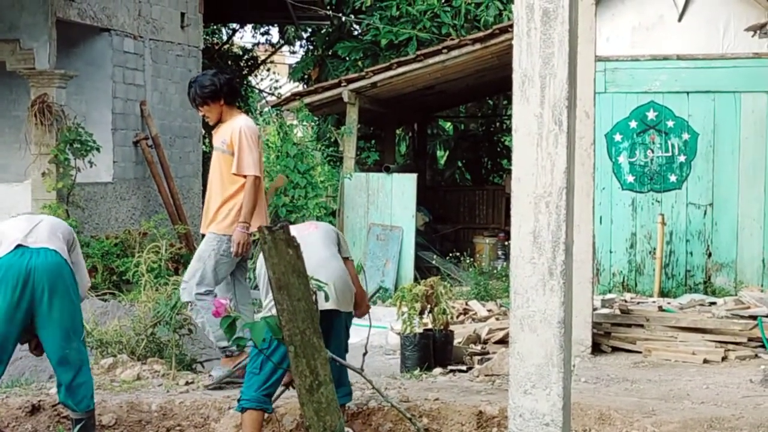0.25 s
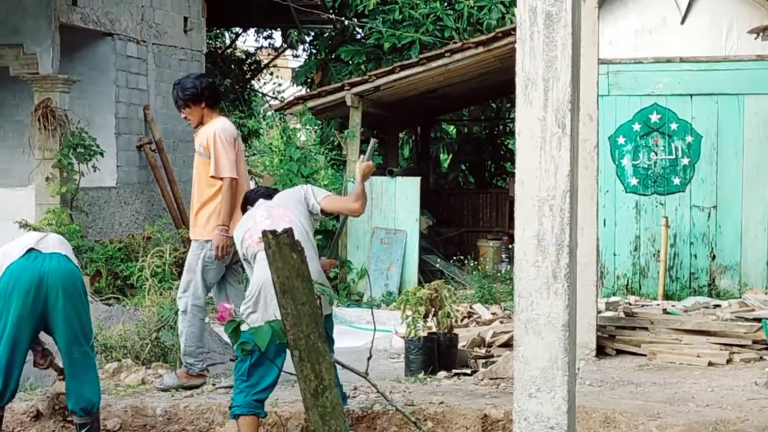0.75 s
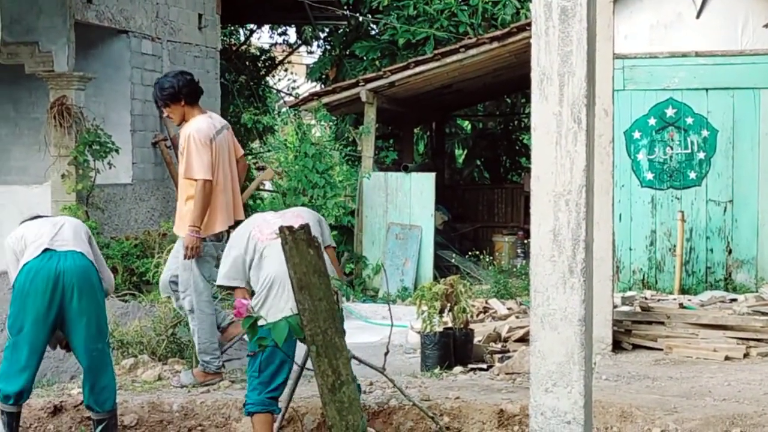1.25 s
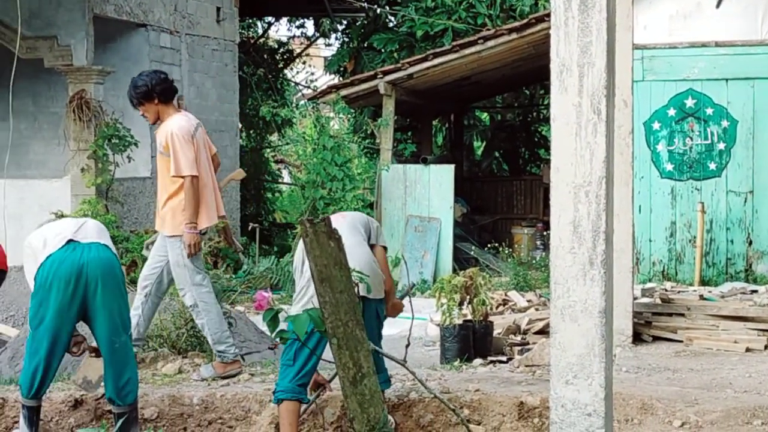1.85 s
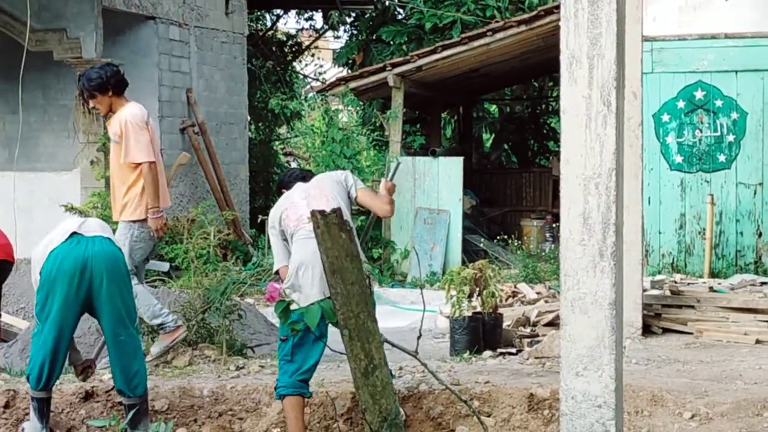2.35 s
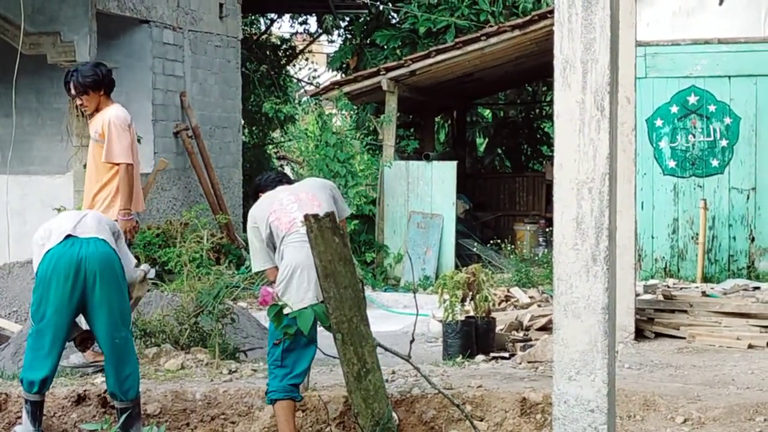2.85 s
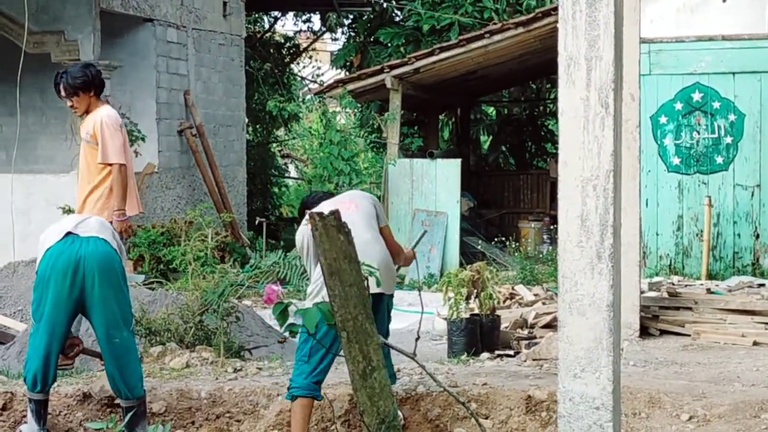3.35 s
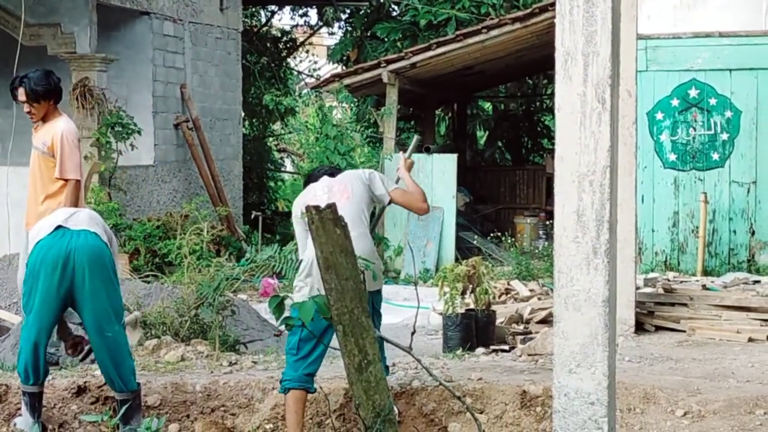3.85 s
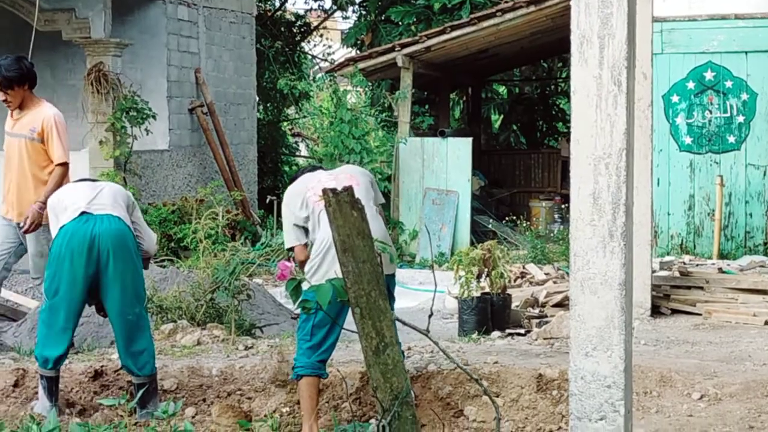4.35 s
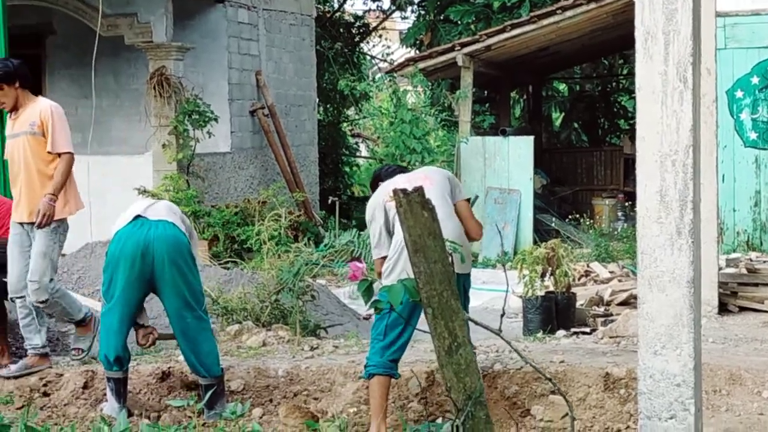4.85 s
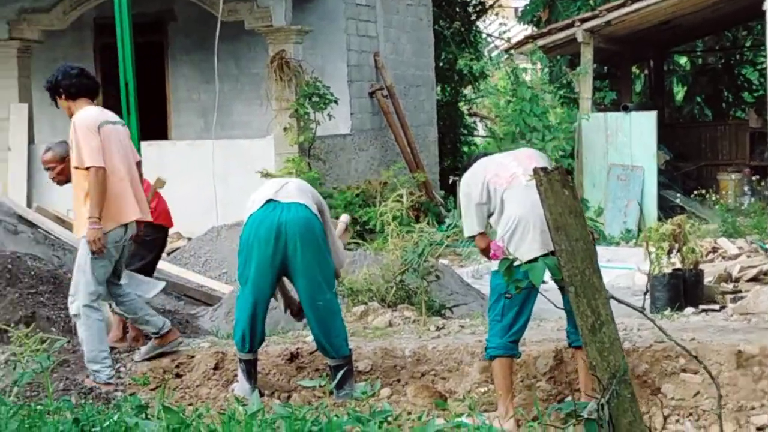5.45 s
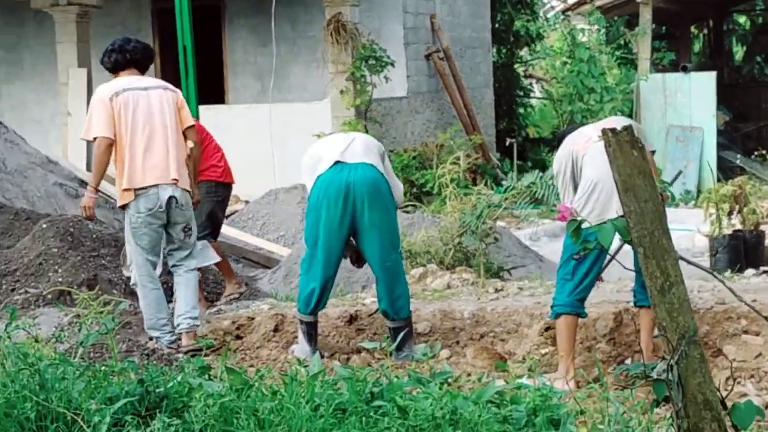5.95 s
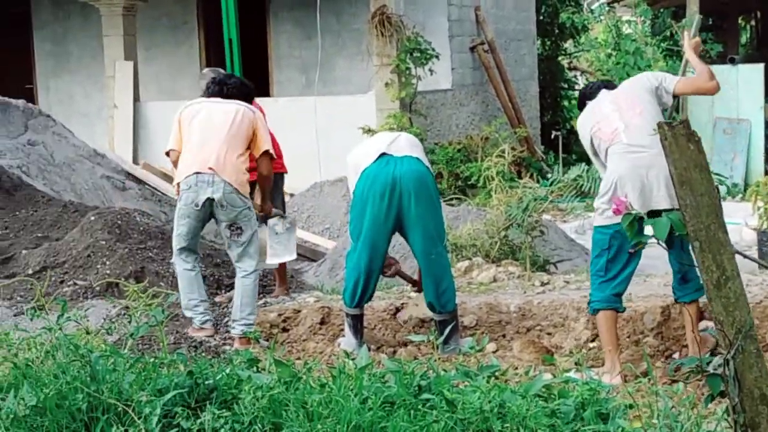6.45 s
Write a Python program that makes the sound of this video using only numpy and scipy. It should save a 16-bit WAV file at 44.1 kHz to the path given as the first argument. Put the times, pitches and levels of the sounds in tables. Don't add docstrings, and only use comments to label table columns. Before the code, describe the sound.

A quiet opening with pebble ticks and faint peeping gives way to a bright shovel strike, then more irregular blows into gravel and earth. Scrapes, sliding sand and small stone clinks fill the gaps, and a couple of strikes add a woody handle knock. Small birds whistle and chirp further off between buildings, with shimmering insects, open air and low traffic behind, picked up by a phone outdoors.

```python
import sys
import numpy as np
from scipy import signal
from scipy.fft import rfft, irfft, next_fast_len
from scipy.io import wavfile
from scipy.ndimage import uniform_filter1d, map_coordinates

SR = 44100
rng = np.random.default_rng(int(sys.argv[2]) if len(sys.argv) > 2 else 0)


def to_wav(sig):
    pcm = np.clip(np.atleast_2d(sig), -1, 1) * 32767
    pcm = np.round(pcm).astype(np.int16)
    wavfile.write(sys.argv[1], SR, pcm.T)


def gain_from_decibels(decibels):
    exponent = np.asarray(decibels, float) / 20
    return 10 ** exponent


N = 295029


def unit(x):
    return x / np.sqrt(np.mean(x ** 2) + 1e-20)


def along(points, hz):
    f, v = np.transpose(points)
    return np.interp(np.log(hz + 1), np.log(f + 1), v)


def from_time(x, s):
    return x[..., round(s * SR):]


def wobble(rate):
    knots = rng.standard_normal(int(N * rate / SR) + 4)
    return map_coordinates(knots, [np.arange(N) * rate / SR])


def filtered(x, response):
    m = next_fast_len(N + SR // 2)
    return irfft(rfft(x, m) * response(np.fft.rfftfreq(m, 1 / SR)), m)[..., :N]


def coloured(x, spectrum):
    return unit(filtered(x, lambda hz: gain_from_decibels(along(spectrum, hz))))


def hiss(spectrum):
    return coloured(rng.standard_normal(N), spectrum)


def peak(hz, centre_hz, width_hz):
    return 1j * hz * width_hz / (centre_hz ** 2 - hz * hz + 1j * hz * width_hz)


def patchy(patchy_db, wide=5, long=10):
    z = signal.stft(rng.standard_normal(N), nperseg=256)[2]
    field = uniform_filter1d(rng.standard_normal(z.shape), wide, 0)
    field = uniform_filter1d(field, long, 1)
    return signal.istft(z * gain_from_decibels(patchy_db * unit(field)), nperseg=256)[1][:N]


# (frequency [Hz], level [dB], t60 [s])
BLADE_MODES = [(1294, -17, 0.2), (1720, -51, 0.13), (2030, -31, 0.12), (2480, -20, 0.017),
               (2790, -16, 0.38), (3350, -23, 0.18), (5380, -20, 0.1), (5560, -26.5, 0.16),
               (6700, -34, 0.2), (11700, -22, 0.036)]
# (frequency [Hz], level [dB per Hz])
STEEL_SPECTRUM = [(410, -104), (700, -19.5), (1110, -5), (1260, -6), (1380, -4.5), (1790, -5.5), (2090, -3),
                  (2760, 1.5), (3330, -3), (3780, -47), (4200, -13.5), (5460, -111), (9240, -120)]
# (frequency [Hz], level [dB per Hz])
SOIL_SPECTRUM = [(59, -17), (100, -15), (167, -2), (360, -14), (509, -3), (786, -10.5), (1000, -1),
                 (1300, -58), (2200, -120)]
# (frequency [Hz], level [dB per Hz])
GRIT_SPECTRUM = [(2120, -27), (3600, -4.5), (3820, -9), (5330, 4.5), (5710, 3), (6470, -3), (7610, 1.5),
                 (8650, -9), (10000, -5), (13000, -31), (22000, -120)]
# (frequency [Hz], level [dB per Hz])
SAND_SPECTRUM = [(5290, -17), (9000, -11.5), (9600, -10), (10300, -2), (13300, 7), (14700, 1), (15600, -14),
                 (16000, -9)]


def strokes():
    blade_level, soil_level, grit_level, sand_level = effort()
    judder = 1.3 * wobble(28) + 0.8 * wobble(130)
    chance, size = rng.random((2, N))
    stone_size = gain_from_decibels(-3.5 * np.log(size + 0.032))
    stones = unit((chance < 1200 / SR) * stone_size)

    def grains(bed, share, own_db):
        cracks = share * stones * rng.choice([-1, 1], N)
        return gain_from_decibels(judder + own_db * wobble(170)) * (bed + cracks)

    steel = unit(grains(patchy(4.5, wide=1, long=31), share=0.58, own_db=1.04))
    hum = filtered(steel, lambda f: sum(gain_from_decibels(db) * peak(f, hz, 12 / t60)
                                        for hz, db, t60 in BLADE_MODES[:6]))
    slips = gain_from_decibels(4 * wobble(22))
    blade = unit(coloured(steel, STEEL_SPECTRUM) + 0.4 * slips * unit(hum))
    soil = coloured(grains(patchy(0.5, wide=1, long=20), share=0.63, own_db=2.5), SOIL_SPECTRUM)
    grit = coloured(grains(patchy(2.5, wide=3, long=15), share=0.35, own_db=1.5), GRIT_SPECTRUM)
    sand = coloured(grains(patchy(2.2, wide=8, long=4), share=0.6, own_db=2.2), SAND_SPECTRUM)
    earth = soil_level * soil + gain_from_decibels(4) * grit_level * grit + sand_level * sand
    return gain_from_decibels(6) * blade_level * blade + earth


# (time [s], blade level [dB], fall [dB/s],
# soil re blade [dB], sand re blade [dB])
SETTLES = [(0.0, -38.5, 135, -5, -1.5), (0.839, -36.5, 115, -15, 5), (1.203, -49, 144, -2.5, 5.5),
           (1.733, -35, 122, -1.5, 1.5), (2.586, -39, 87, -15, 6.5), (2.957, -51.5, 165, -3, 1),
           (3.378, -39, 116, -6.5, -6), (4.059, -34.5, 138, -27, 5), (4.754, -43, 119, -2.5, -13),
           (4.922, -39, 103, -17, 7), (5.53, -47.5, 145, -1.5, -4), (5.744, -32.5, 132, -15, 4.5),
           (6.577, -41.5, 136, -12, 2)]
# (time of full pressure [s], rise [s], hold [s], blade level [dB],
# sand re blade [dB])
DRAGS = [(0.158, 0.15, 0.16, -53, 1), (0.415, .1, 0.2, -76, 12), (1.98, 0.57, 0.087, -57.5, -4),
         (2.747, 0.093, 0.066, -60, 0.5), (2.258, 0.12, 0.017, -42.5, -10),
         (2.423, 0.28, 0.068, -41.5, -2.5), (3.694, 0.027, 0.22, -50.5, 3), (3.89, 0.087, 0.029, -45, -12),
         (3.702, .02, 0.015, -48.5, 1), (4.008, 0.15, 0.046, -46.5, -14), (4.224, .08, 0.056, -50.5, -15),
         (4.36, 0.33, 0.082, -56.5, -5), (4.757, 0.034, 0.13, -52, 0.5), (5.03, 0.081, 0.022, -47, -3),
         (5.337, 0.14, 0.037, -46, -4)]
SOIL_FALLS, GRIT_FALLS, SAND_FALLS = 1.96, 1.26, 2.9
TRICKLE_DB, TRICKLE_DB_PER_S = -18, 41
RISE_DB, RELEASE_DB_PER_S, DRAG_SOIL_DB = 34, 124, -10
GRIT_DB, GRIT_FOLLOWS = -9, 0.9


def effort():
    t, power = np.arange(N) / SR, np.full((4, N), 1e-12)
    falls = np.array([1, SOIL_FALLS, GRIT_FALLS, SAND_FALLS])[:, None]

    def mix(soil_db, sand_db):
        return np.array([0, soil_db, GRIT_DB + GRIT_FOLLOWS * sand_db, sand_db])[:, None]

    for s, db, fall, soil_db, sand_db in SETTLES:
        u = from_time(t, s)[:SR] - s
        slide = gain_from_decibels(-fall * falls * u) ** 2
        trickle = gain_from_decibels(TRICKLE_DB * falls - TRICKLE_DB_PER_S * u) ** 2
        start = np.clip(u / 0.0074, 0, 1)
        from_time(power, s)[:, :SR] += gain_from_decibels(db + mix(soil_db, sand_db)) ** 2 * (slide + trickle) * start
    for s, rise, hold, db, sand_db in DRAGS:
        before_db = RISE_DB * np.maximum(s - t, 0) / rise
        after_db = RELEASE_DB_PER_S * np.maximum(t - s - hold, 0)
        power += gain_from_decibels(db - before_db - after_db) ** 2 * gain_from_decibels(mix(DRAG_SOIL_DB, sand_db)) ** 2
    return np.sqrt(power)


def blows():
    t = np.arange(SR // 4) / SR
    body, top, ring = np.zeros((3, N + SR))
    mode_hz, mode_db, mode_t60 = np.transpose(BLADE_MODES)[..., None]
    for s, db, sparkle_db, ring_db, knock_hz in contacts():
        crack, crumble = gain_from_decibels(db - 60 * t / 0.02), gain_from_decibels(db - 12 - 60 * t / 0.033)
        burst = (crack + crumble) * (1 - np.exp(-t / 0.0021))
        from_time(body, s)[:len(t)] += burst
        from_time(top, s)[:len(t)] += gain_from_decibels(sparkle_db) * burst * gain_from_decibels(-60 * t / 0.055)
        sway, turn = np.clip(rng.standard_normal((2, len(BLADE_MODES), 1)), -1.3, 1.3)
        rattle = np.cumsum(0.1 * rng.standard_normal((len(BLADE_MODES), len(t))), axis=1)
        phase = 2 * np.pi * mode_hz * (1 + 0.0147 * turn) * t + rattle
        modes = gain_from_decibels(mode_db + 8.9 * sway - 60 * t / mode_t60) * np.sin(phase)
        from_time(ring, s)[:len(t)] += gain_from_decibels(db + ring_db) * modes.sum(0) * (1 - np.exp(-t / 0.0071))
        spot = np.sin(2 * np.pi * knock_hz * t + 2 * rattle[0])
        from_time(ring, s)[:len(t)] += gain_from_decibels(db - 15 - 60 * t / 0.067) * spot

    def crush(spectrum):
        return coloured(gain_from_decibels(3 * wobble(500)) * rng.standard_normal(N), spectrum)

    sparkle = filtered(crush(SAND_SPECTRUM), lambda f: 1 / (1 + (f / 14500) ** 10))
    sparkle = sparkle + gain_from_decibels(-7) * crush(GRIT_SPECTRUM)
    return gain_from_decibels(-8.5) * (body[:N] * crush(STEEL_SPECTRUM) + top[:N] * sparkle) + ring[:N]


# (time [s], peak level [dB], sparkle re peak [dB], ring re peak [dB],
# knock [Hz])
SWINGS = [(0.8449, -7.5, 7.5, -6, 2916), (0.8519, -8, -18, -19, 1720), (1.7348, -8, 4.5, -16, 2790),
          (1.7593, -14, -23, -19, 2220), (2.3398, -18.5, -9, -8, 3220), (2.586, -8, 6, -15.5, 1845),
          (3.3701, -18, 7, -2, 1736), (4.059, -11, 2, -30, 2103), (4.0672, -11, -13, -6, 2012),
          (4.2294, -17, -5.5, -32, 2480), (4.7535, -16, -11, -21, 2480), (4.9235, -5.5, -2.5, -13, 1748),
          (5.7443, -5.5, -5, -4.5, 2890), (6.0798, -34, -28, -12.5, 1230), (6.5782, -12.5, 2, -23, 2806)]
# (time [s], peak level [dB], sparkle re peak [dB], ring re peak [dB])
CATCHES = [(0.4025, -50, -21, -18), (0.712, -33, -29, -32), (0.8827, -11, -18, -7),
           (1.2032, -18, -2.5, -31), (1.63, -32, -31, -22), (1.7757, -16.5, -3, -1),
           (2.2424, -27, -14, -16), (2.2674, -17, -5, -28), (2.374, -15.5, -6, -11),
           (2.956, -24.5, -23, -27), (3.7069, -18.5, 3.5, -29), (3.714, -13, -12, -22),
           (3.7358, -27.5, -22, -33), (3.783, -19, -2, -21), (3.9836, -20.5, -1, -7),
           (4.2127, -25, 6.5, -6.5), (4.3377, -25.5, -9, -6), (5.0398, -17, 4, -29), (5.2864, -52, -8, -12),
           (5.526, -23.5, -31, -16), (6.528, -37, -27, -14)]
CATCH_HZ = 2783
# (time [s], peak level [dB], knock [Hz])
HANDLE_BLOWS = [
    (3.371, -10, 1100),
    (3.391, -24, 1270),
    (5.741, -12, 1402),
]
HANDLE_DULL_DB = -36


def contacts():
    catches = [(*row, CATCH_HZ) for row in CATCHES]
    handle = [(s, db, HANDLE_DULL_DB, HANDLE_DULL_DB, hz) for s, db, hz in HANDLE_BLOWS]
    return sorted([*SWINGS, *catches]) + handle


# (time [s], level [dB])
THUDS = [(0.7146, -40), (0.8445, -27.5), (0.851, -39), (1.735, -30), (1.7593, -53), (2.246, -36),
         (2.264, -33), (2.587, -29.5), (2.961, -37.5), (3.3701, -44), (3.713, -46), (4.069, -37),
         (4.336, -36), (4.9224, -28.5), (5.0396, -38), (5.7443, -29.5), (6.528, -43.5)]
# (frequency [Hz], level [dB per Hz])
GROUND_SPECTRUM = [(70, -53), (130, 10.5), (300, 6), (480, 2), (700, -69), (1200, -56)]


def thuds():
    t, low = np.arange(SR // 4) / SR, np.zeros(N + SR)
    for s, db in THUDS:
        from_time(low, s)[:len(t)] += gain_from_decibels(db + 2 - 60 * t / 0.055) * (1 - np.exp(-t / 0.0068))
    return low[:N] * hiss(GROUND_SPECTRUM)


# (time [s], peak level [dB], frequency [Hz], t60 [s])
CHIPS = [(0.8465, -10.5, 2880, .012), (0.8463, -10, 11700, 0.013), (0.851, -18.5, 11900, 0.018),
         (0.8665, -23, 2900, .03), (0.868, -37, 12200, 0.026), (0.876, -28, 12000, 0.017),
         (0.883, -18, 2830, 0.022), (0.8902, -16, 2950, .02), (0.898, -23, 2780, .03),
         (5.284, -46, 4400, .02), (1.738, -13, 11700, 0.017), (1.742, -16, 12200, .015),
         (1.7415, -24, 3080, 0.012), (1.7735, -28, 10850, 0.033), (1.775, -28, 12700, 0.024),
         (1.781, -29, 13600, .02), (2.5858, -4, 2200, 0.0071), (2.5874, -6, 2600, 0.0073),
         (2.586, -15.5, 12100, 0.0085), (2.96, -37, 2250, .03), (2.884, -42, 3030, .015),
         (3.3715, -14, 1730, 0.0078), (3.7365, -19, 2800, 0.023), (3.838, -30, 2650, 0.037),
         (3.855, -31, 2490, 0.036), (4.0594, -7.5, 2000, 0.0091), (4.0695, -10, 2140, 0.0087),
         (4.068, -39, 12400, 0.023), (4.076, -35, 11400, 0.018), (4.9245, -4, 2550, 0.0055),
         (5.744, -18, 10780, 0.018), (5.744, -24, 13700, 0.026), (5.746, -8.5, 2750, 0.011),
         (5.7485, -8, 2800, .01), (6.5755, -19, 2380, 0.011), (6.5755, -28, 12500, .012),
         (6.587, -21, 2870, 0.017)]
# (time [s], peak level [dB], frequency [Hz], t60 [s])
KNOCKS = [(0.35, -53, 215, .05), (2.092, -44, 299, 0.055), (2.246, -37, 503, .05), (3.715, -44, 417, .1),
          (3.8, -54, 440, 0.12), (3.9, -51, 430, 0.17), (3.986, -38, 690, 0.046), (5.039, -38, 456, 0.067),
          (5.391, -38.5, 452, 0.067), (5.525, -44, 306, .05), (5.527, -43.5, 920, 0.097),
          (0.86, -37, 1150, .12), (4.923, -24, 1470, 0.054), (2.44, -36, 1240, 0.17),
          (2.49, -38, 2070, 0.13), (6.083, -51, 250, .06), (6.548, -31.5, 453, 0.017),
          (3.385, -34, 2614, 0.28), (3.39, -38.5, 1237, .25), (5.746, -26, 2148, 0.24),
          (6.579, -39, 390, .06)]


def chips():
    out, t = np.zeros(N + SR), np.arange(SR // 5) / SR
    for s, db, hz, t60 in [*CHIPS, *KNOCKS]:
        onset = 1 - np.exp(-t * hz / 1.64)
        from_time(out, s)[:len(t)] += gain_from_decibels(db - 60 * t / t60) * np.sin(2 * np.pi * hz * t) * onset
    return out[:N]


# (time [s], peak level [dB], body re peak [dB])
TICKS = [(0.025, -24, -4), (0.07, -25, -5), (0.877, -24, 5), (0.995, -45, -10), (1.165, -42, -15),
         (1.4726, -46, -16), (1.871, -36, -20), (1.9934, -35, 4), (2.0656, -32.5, 1), (2.6938, -33, -8),
         (3.6738, -41.5, 17.5), (3.6964, -37, -14), (3.7703, -23, -17), (3.8004, -19.5, 2),
         (3.9664, -31, -15), (3.82, -33, -5), (3.838, -33, -6), (4.0223, -34, -3), (4.1345, -26, 2.5),
         (4.189, -33, -4), (4.152, -32, -13), (4.7745, -22, -4), (5.278, -37, 0), (5.3577, -30, -8),
         (0.403, -39, 4.5), (0.648, -45, 5), (0.733, -48, 0), (2.396, -27, -8), (2.419, -30, -8),
         (2.44, -26, -1), (2.471, -33, -11), (2.507, -40, -6), (2.298, -36, -10), (2.257, -24, -14),
         (2.3631, -22, -3), (4.8286, -39, -10), (5.3135, -35, -2), (6.257, -60, 2), (6.5485, -48, -20),
         (6.661, -44, -15), (6.668, -42, -10)]
# (time of blow [s], length [s], level [dB], sparkle re level [dB])
BITES = [
    (0.846, 0.0083, -26, 2),
    (1.2014, 0.0047, -44, -5),
    (1.7348, 0.0026, -17.5, 0),
    (2.587, 0.0055, -21, -5),
    (3.367, 0.0026, -35, -3),
    (4.753, 0.01, -28, -11),
    (4.9235, 0.0024, -26, -17),
    (5.7433, 0.0042, -21, -6),
    (6.574, 0.0029, -38, 4),
]
BITE_RISE_DB = 19.5


def ticks():
    t = np.arange(SR // 20) / SR
    top, body = np.zeros((2, N + SR))
    for s, db, body_db in TICKS:
        from_time(top, s)[:len(t)] += gain_from_decibels(db - 14 - 60 * t / 0.046)
        from_time(body, s)[:len(t)] += gain_from_decibels(db + body_db - 14 - 60 * t / 0.049)
    for s, length, db, sparkle_db in BITES:
        rise = gain_from_decibels(db - BITE_RISE_DB * np.linspace(1, 0, round(length * SR)))
        before = slice(round(s * SR) - len(rise), round(s * SR))
        body[before] += rise
        top[before] += gain_from_decibels(sparkle_db) * rise
    return top[:N] * hiss(SAND_SPECTRUM) + body[:N] * (hiss(STEEL_SPECTRUM) + 0.33 * hiss(GRIT_SPECTRUM))


def bump():
    t = np.arange(N) / SR - 0.0357
    push = 0.17 * np.exp(-(t / 0.0012) ** 2) * np.sin(2 * np.pi * 340 * t)
    rebound = 0.017 * (t > 0) * gain_from_decibels(-60 * np.abs(t) / 0.083) * np.sin(2 * np.pi * 120 * t - 1.5)
    return push - rebound


# (frequency [Hz], level [dB])
CALL_COLOUR = [(1500, -3), (2200, 5), (2900, 5), (3500, 1.5), (3900, -6), (7000, -12)]
# (delay [s], level [dB])
ECHOES = [
    (.011, -6),
    (.027, -7),
    (.044, -11),
]
CALL_WET_DB, WHISTLE_WET_DB = -5, -18
CALL_RASP, WHISTLE_RASP = 1.15, 0.5


def peeps():
    out, rasp = np.zeros((2, N + SR)), wobble(150)
    for k, (s, length, first_hz, middle_hz, last_hz, db) in enumerate(calls()):
        is_level = k < len(WHISTLES)
        u = np.linspace(0, 1, round(length * SR))
        hz = np.polyval(np.polyfit([0, 0.5, 1], [first_hz, middle_hz, last_hz], 2), u)
        scatter = (WHISTLE_RASP if is_level else CALL_RASP) * from_time(rasp, s)[:len(u)]
        phase = 2 * np.pi * np.cumsum(hz) / SR + scatter
        swell = (1 - np.exp(-u / 0.12)) * (1 - np.exp(-(1 - u) / 0.06))
        from_time(out[int(is_level)], s)[:len(u)] += gain_from_decibels(db + 4.5) * swell * np.sin(phase)
    flutter = wobble(110)
    breath = gain_from_decibels([3.6 * flutter, 2.2 * flutter])
    glides, level = filtered(out[:, :N] * breath, lambda f: gain_from_decibels(along(CALL_COLOUR, f)))
    glides = glides + sum(gain_from_decibels(db) * np.roll(glides, round(s * SR)) for s, db in ECHOES)
    return glides + level, gain_from_decibels(CALL_WET_DB) * glides + gain_from_decibels(WHISTLE_WET_DB) * level


# (time [s], length [s], pitch [Hz], level [dB])
WHISTLES = [(0.273, 0.041, 4470, -54), (1.04, 0.12, 6270, -58), (1.164, 0.11, 4220, -59),
            (1.51, 0.1, 4410, -52), (1.798, .21, 5550, -58), (2.641, 0.19, 5600, -54),
            (2.996, .08, 5380, -60), (3.04, 0.065, 1860, -56.5), (3.495, 0.14, 4360, -56.5),
            (4.637, 0.11, 4560, -50.5), (5.955, 0.095, 5150, -63.5), (6.09, 0.061, 5200, -67),
            (6.135, 0.068, 4420, -58), (6.237, .085, 5350, -60), (6.378, .05, 3730, -68),
            (2.192, 0.024, 1960, -50), (3.073, 0.085, 2670, -64), (4.29, .045, 4200, -64),
            (4.355, .03, 3920, -62), (1.175, .04, 5100, -66), (5.85, 0.093, 2180, -61),
            (5.846, 0.137, 2800, -52), (6.424, 0.093, 5450, -74), (6.53, .045, 4600, -66)]
ARCH_START, ARCH_END = 0.99, 0.98
# (time [s], length [s], first [Hz], last [Hz], level [dB])
DROOPS = [(0.47, .06, 5150, 4700, -69), (0.585, .07, 4230, 3950, -66), (1.03, .08, 2800, 2450, -61),
          (1.225, .05, 4200, 3950, -64), (1.275, .1, 2900, 2540, -58.5), (1.33, .055, 5500, 5050, -67),
          (1.39, .11, 6300, 5850, -62), (1.59, .04, 4250, 3900, -66), (1.86, .135, 4380, 3200, -59.5),
          (2.03, .05, 3430, 3250, -69), (2.039, .145, 2620, 2130, -53.5), (2.09, .08, 5300, 4700, -65),
          (2.13, .115, 4530, 4300, -58.5), (2.815, .11, 4450, 4050, -56.5), (2.91, .145, 3100, 2150, -51.5),
          (2.92, .14, 3950, 3150, -61), (3.05, .13, 4450, 4050, -68), (3.236, .14, 4260, 3420, -57.5),
          (3.245, .1, 4750, 4300, -67), (3.265, .1, 2772, 2050, -54.5), (3.535, .075, 3100, 2800, -64),
          (3.575, .09, 3500, 2800, -60), (4.55, .1, 5350, 4800, -67), (4.595, .05, 3400, 3100, -65),
          (5.56, .155, 2850, 1500, -56), (5.59, .1, 5200, 4450, -70), (5.87, .12, 3350, 2450, -58),
          (6.424, .1, 2850, 2650, -55.5), (6.5, .055, 5350, 4400, -63), (6.52, .055, 2700, 2150, -53)]
# (time [s], length [s], first [Hz], last [Hz], level [dB])
PLUNGES = [(0.298, .14, 4050, 2400, -54.5), (0.66, .05, 3800, 2900, -68), (0.705, .1, 2850, 2100, -53),
           (1.585, .09, 3850, 2500, -61), (1.99, .055, 3050, 2650, -60), (3.18, .092, 4040, 2730, -58.5),
           (3.605, .09, 2850, 2085, -50), (4.36, .09, 3300, 2600, -63), (4.4, .09, 5600, 5200, -67),
           (4.5, .105, 3050, 2250, -58), (4.61, .055, 2450, 2200, -61), (5.185, .13, 3630, 2400, -57),
           (6.19, .07, 4050, 3100, -58), (6.25, .055, 2900, 2330, -61), (6.42, .06, 3700, 3000, -66)]
DROOP_HALFWAY, PLUNGE_HALFWAY = 0.3, 0.6


def calls():
    level = [(s, n, ARCH_START * hz, hz, ARCH_END * hz, db) for s, n, hz, db in WHISTLES]

    def fall(rows, share):
        return [(s, n, a, a + share * (b - a), b, db) for s, n, a, b, db in rows]

    return level + fall(DROOPS, DROOP_HALFWAY) + fall(PLUNGES, PLUNGE_HALFWAY)


# (frequency [Hz], t60 [s])
WALL_DECAY = [(500, 0.59), (2500, 0.3), (6000, 0.51), (14000, 0.23)]


def walls(x):
    hz, t, z = signal.stft(rng.standard_normal(SR // 2), SR, nperseg=256)
    decay = gain_from_decibels(-60 * t / along(WALL_DECAY, hz)[:, None])
    tail = signal.istft(z * decay, SR, nperseg=256)[1]
    late = np.pad(x, (300, 0))
    return signal.fftconvolve(late, tail / np.linalg.norm(tail))[:N]


# (time [s], level [dB])
CHORUS = [(0, -58), (.6, -71.5), (1.45, -62), (1.7, -73.5), (2.5, -61.5), (3.0, -71.5), (3.6, -61),
          (4.7, -62.5), (5.2, -72), (5.6, -62.5), (6.5, -71)]
HIGH_CHORUS_DB = -66.5


def insects():
    low_db = np.interp(np.arange(N) / SR, *np.transpose(CHORUS))
    wing_hz = 176 + 3 * wobble(20)
    throb = 1 + 0.38 * np.sin(2 * np.pi * np.cumsum(wing_hz) / SR)
    low = filtered(rng.standard_normal(N), lambda f: peak(f, 7520, 420) ** 2)
    high = filtered(patchy(1.5), lambda f: peak(f, 9950, 1500) ** 2)
    return gain_from_decibels(low_db + 1.8 * wobble(5)) * unit(throb * low) + gain_from_decibels(HIGH_CHORUS_DB) * unit(high)


# (frequency [Hz], level [dB per Hz])
RUMBLE_SPECTRUM = [(15, -40), (25, -1), (32, -0.5), (70, 0), (178, -6.5), (214, -15.5), (303, -19),
                   (400, -61), (520, -27), (880, -120)]
# (frequency [Hz], level [dB per Hz])
AIR_SPECTRUM = [(200, -23), (300, -1), (1000, -3.5), (2000, -3), (2700, 0.5), (3400, -7), (4000, -13.5),
                (6300, -16.5), (9000, -21), (13000, -21), (16000, -20)]
ROAD_DB, PASS_S, PASS_WIDE_S, PASS_DB = -55.5, 3.01, 0.35, 4


def distance():
    road_db = ROAD_DB + PASS_DB * np.exp(-((np.arange(N) / SR - PASS_S) / PASS_WIDE_S) ** 2)
    rumble = gain_from_decibels(road_db + 1 + 2.8 * wobble(6.2)) * hiss(RUMBLE_SPECTRUM)
    air = gain_from_decibels(-61 + 2.6 * wobble(3.65)) * coloured(patchy(2.5), AIR_SPECTRUM)
    return rumble + air


def scene():
    hits = blows() + thuds() + ticks() + chips()
    birds, birds_to_walls = peeps()
    near = strokes() + hits + gain_from_decibels(-12) * walls(hits) + bump()
    return (near + birds + walls(birds_to_walls) + insects() + distance())[None]


def low_pass(x):
    return signal.sosfilt(signal.butter(12, 16480, fs=SR, output="sos"), x)


def record(dry):
    ceiling, top_hz = 0.6, 15900
    held = dry / (1 + np.abs(dry / ceiling) ** 4) ** (1 / 4)
    mix = filtered(held, lambda hz: hz < top_hz)
    return low_pass(mix)


dry = scene()
out = record(dry)
to_wav(out)
```